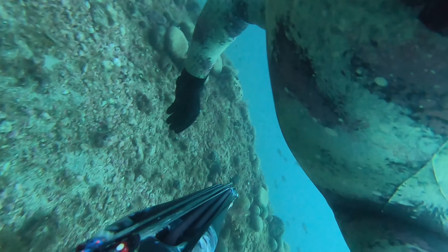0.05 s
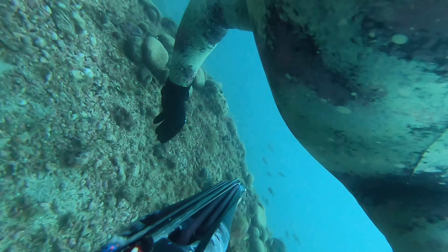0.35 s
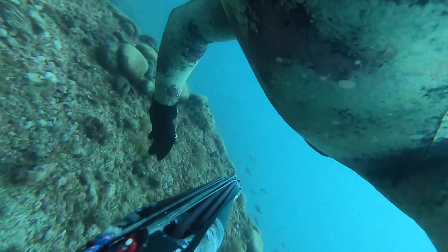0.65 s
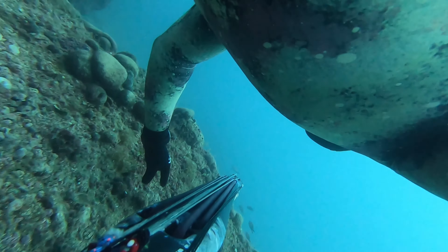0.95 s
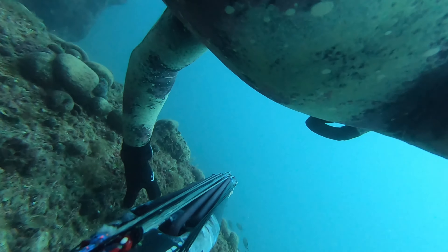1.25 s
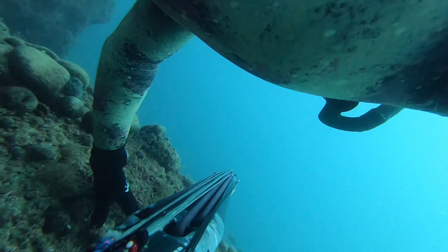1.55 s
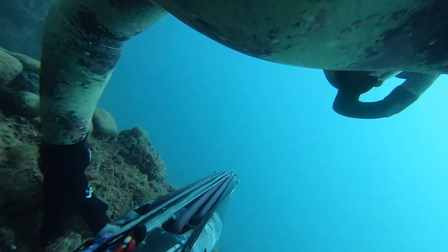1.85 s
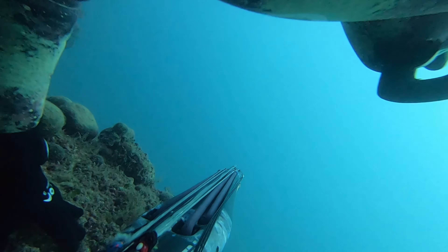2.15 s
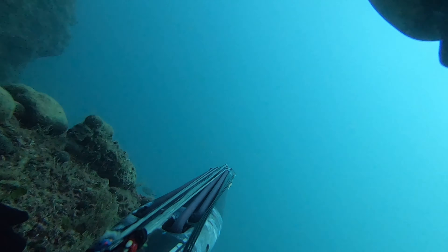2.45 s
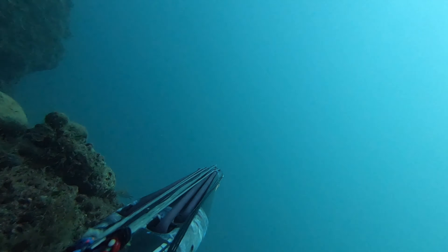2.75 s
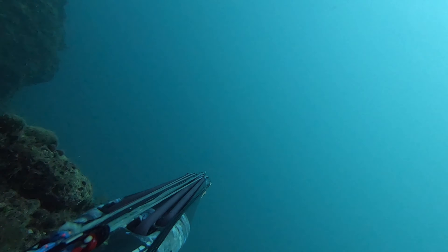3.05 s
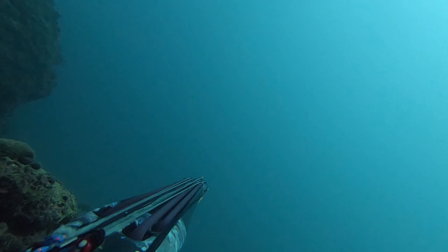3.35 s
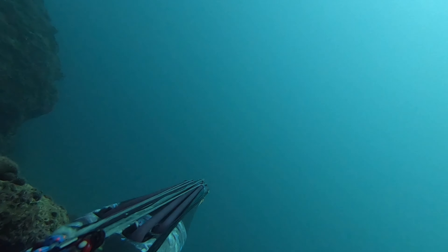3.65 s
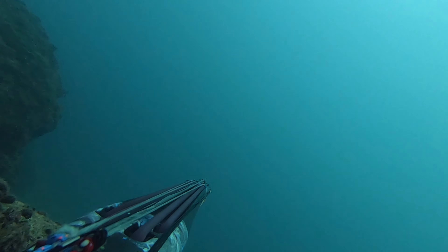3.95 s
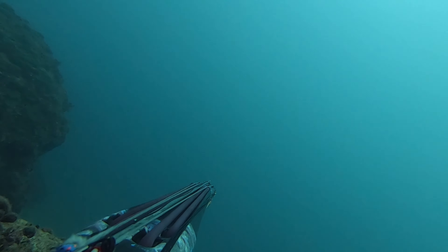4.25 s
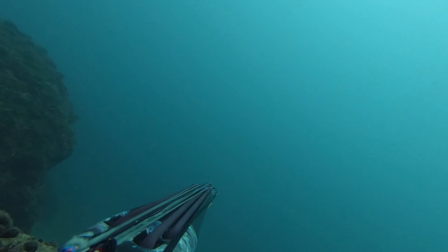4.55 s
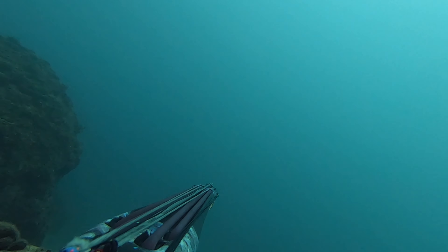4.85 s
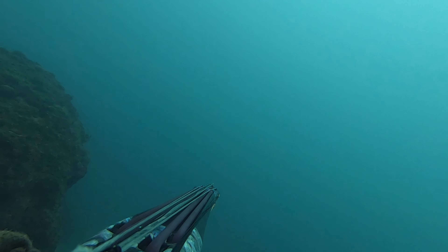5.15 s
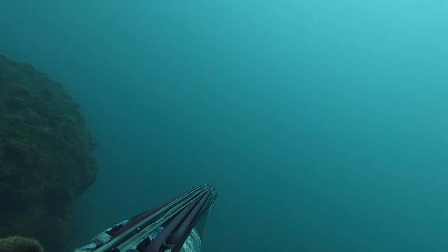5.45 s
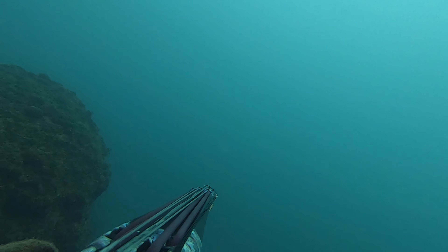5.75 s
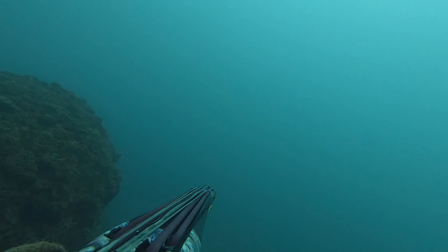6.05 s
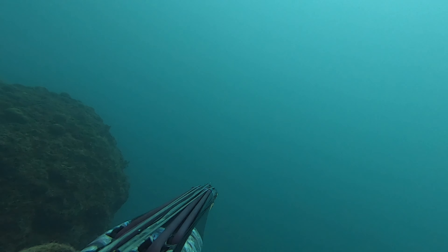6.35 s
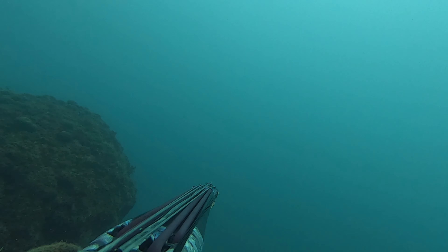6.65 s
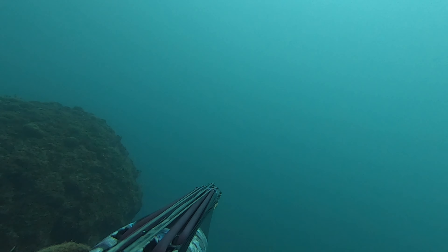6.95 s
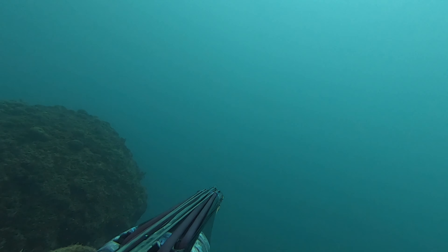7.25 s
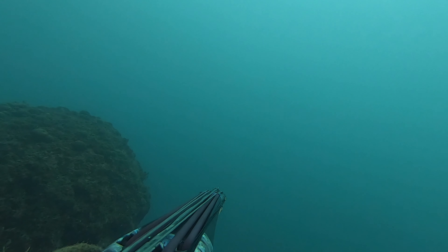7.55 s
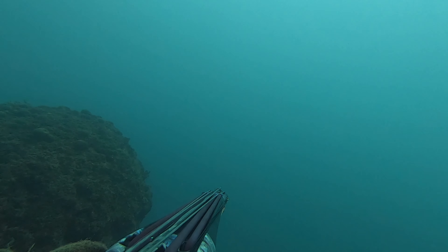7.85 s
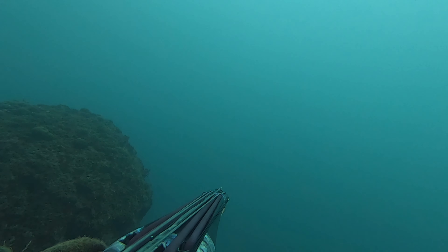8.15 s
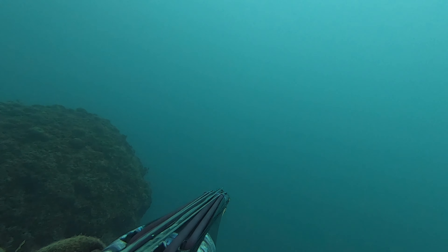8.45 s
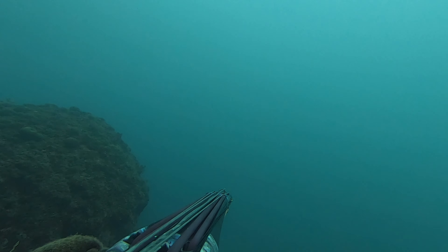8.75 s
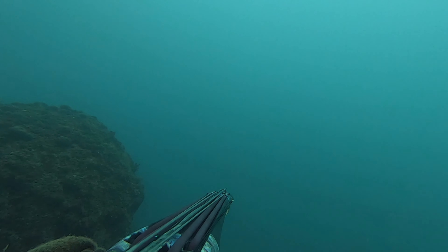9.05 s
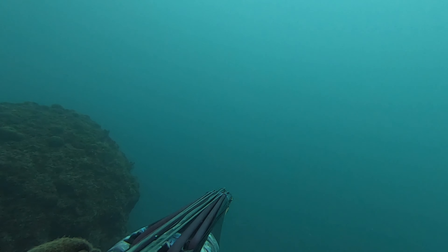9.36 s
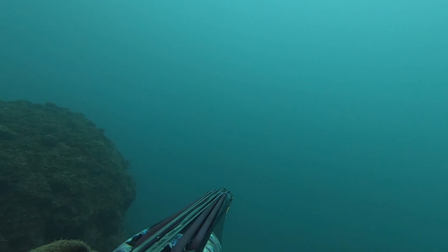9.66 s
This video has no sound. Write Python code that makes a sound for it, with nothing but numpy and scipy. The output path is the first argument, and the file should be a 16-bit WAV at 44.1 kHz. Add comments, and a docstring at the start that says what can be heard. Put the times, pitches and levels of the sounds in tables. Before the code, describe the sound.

A dense underwater crackle of tiny clicks, with close knocks, thumps and squeaky rubbing from a diver's gear and a few bubbles.

```python
"""Under the sea beside a reef, heard from inside a camera housing on a diver's speargun.
Snapping shrimp crackle all round; a deep throb, a rumble and a hollow hum swell with the water.
As the diver pulls along the rock, gear rubs, squeaks and knocks on the gun, a glove crunches
on the crust, and bubbles fizz and plop. The stereo image closes to mono for the middle seconds."""
import sys
import numpy as np
from scipy import signal
from scipy.fft import rfft, irfft, next_fast_len
from scipy.io import wavfile

SR = 44100
rng = np.random.default_rng(int(sys.argv[2]) if len(sys.argv) > 2 else 0)


def generate_wav(sig):
    """Save sig (samples, or channels by samples) to the path in sys.argv[1] as 16-bit PCM at SR."""
    pcm = np.round(np.clip(np.atleast_2d(sig).T, -1, 1) * 32767).astype(np.int16)
    wavfile.write(sys.argv[1], SR, pcm)


N = 436149
TIME = np.arange(N) / SR
TOP_HZ = 15400

# strokes of gear along the gun: start/s, length/s, level/dB, sag/dB, squeak f/Hz
RUB_STROKES = [(0.0, 0.096, -52.5, -4, 1400), (0.125, 0.15, -43, 0, 2090), (0.335, 0.09, -44, -1, 1420),
               (0.45, 0.05, -52, 3, 1400), (0.508, 0.035, -44.5, 0, 2090), (0.56, 0.09, -50, 0, 450),
               (0.668, 0.11, -40, 6.5, 1320), (1.995, 0.3, -38, 14, 1500), (2.356, 0.031, -38.5, -5, 1470),
               (2.443, 0.09, -50.5, 1, 1450), (2.555, 0.17, -40, -2, 1530), (2.753, 0.34, -38.5, 17, 750),
               (3.138, 0.04, -41, 3.5, 520), (8.79, 0.051, -42.5, 1, 1290), (8.923, 0.03, -53.5, 0, 780),
               (9.373, 0.073, -45, 8, 850)]
# stereo image: t/s, width (0 mono, 1 full)
STEREO_WIDTH = [(0, 1), (2.7, 0.95), (3.1, 0.4), (3.6, 0.01), (7.4, 0), (7.9, 0.19), (8.4, 0.72),
                (9.89, 0.8)]


def undb(db):
    """Decibels to gain."""
    return 10 ** (np.asarray(db) / 20)


def unit(x):
    """Scale to rms 1."""
    return x / np.sqrt(np.mean(x ** 2))


def peak(x, db):
    """Set the peak level."""
    return x * undb(db) / np.abs(x).max()


def add(track, s, x):
    """Mix a short sound in at s seconds."""
    i = max(int(s * SR), 0)
    track[..., i:i + x.shape[-1]] += x[..., :N - i]


def curves(table):
    """Each column after the first as an automation curve through time."""
    s, *columns = np.transpose(table)
    return [np.interp(TIME, s, c) for c in columns]


def over_pitch(table, size):
    """Each column after the first as a curve over the bins of a transform."""
    hz, *columns = np.transpose(table)
    bins = np.maximum(np.arange(size // 2 + 1) * SR / size, 1)
    return [np.interp(np.log(bins), np.log(hz), c) for c in columns]


def colour(x, points):
    """Minimum-phase EQ through (f/Hz, level/dB) points, so resonances ring after each click."""
    size = 2 * next_fast_len(len(x) // 2 + 2048)
    cepstrum = irfft(np.log(undb(over_pitch(points, size)[0])))
    cepstrum[1:size // 2] *= 2
    cepstrum[size // 2 + 1:] = 0
    return irfft(rfft(x, size) * np.exp(rfft(cepstrum)))[:len(x)]


def tinted(x, tint_db, low_hz=1500, high_hz=14000, count=7):
    """A random EQ gives a sound its own colour."""
    bands = np.geomspace(low_hz, high_hz, count)
    return colour(x, [(hz, tint_db * rng.standard_normal()) for hz in bands])


def dulled(x, top_hz, order=4):
    """Roll off the treble above top_hz, or TOP_HZ if that is lower."""
    return signal.sosfilt(signal.butter(order, min(top_hz, TOP_HZ), fs=SR, output="sos"), x)


def resonance(x, hz, width_hz):
    """What one resonance picks out of a sound."""
    return signal.lfilter(*signal.iirpeak(hz, hz / width_hz, fs=SR), x)


def walk(rate):
    """Random drift with a spread near 1, turning rate times a second."""
    knots = np.arange(0, N / SR + 1, 1 / rate)
    return 1.2 * np.interp(TIME, knots, rng.standard_normal(len(knots)))


def clicks(rate, spread_db, range_db):
    """Random impulses, most of them small and a few up to range_db larger."""
    hit, size, sign = rng.random((3, N))
    db = -spread_db * np.log(1 - size * (1 - np.exp(-range_db / spread_db)))
    return (hit < rate / SR) * undb(db) * np.sign(sign - .5)


def scatter(fade_ms, share, size=2048):
    """An impulse and a fading spray of reflections, share times as strong."""
    tail = rng.standard_normal(size) * np.exp(-np.arange(size) / SR * 1000 / fade_ms)
    tail *= share / np.linalg.norm(tail)
    tail[0] += 1
    return tail


def swell(start, length, db, sag_db, attack_s=0.028, release_s=0.014):
    """The envelope of one push: a quick rise, a sagging hold, a release."""
    t = TIME - start
    rise = np.clip(1 + t / attack_s, 0, 1) ** 2
    hold = undb(db - sag_db * np.clip(t / length, 0, 1))
    return rise * hold * np.exp(-np.maximum(t - length, 0) / release_s)


def colony(rate, spread_db, range_db, fade_ms, share, tint_db, busy_db, patches=10):
    """Patches of shrimp; each snaps in bouts and arrives with its own echoes and tint."""
    out = 0
    for _ in range(patches):
        path = tinted(scatter(fade_ms, share), tint_db)
        bouts = clicks(rate / patches, spread_db, range_db) * undb(busy_db * walk(4))
        out += signal.oaconvolve(bouts, path / np.linalg.norm(path))[:N]
    return out


def shrimp_bed():
    """Thousands of far snaps merge into a wash, under nearer crackle and a fine sizzle."""
    # the colony: t/s, far level/dB, near level/dB, share of open-water colour (0-1)
    reef_levels = [(0.0, -59.5, -65.5, 0.7), (0.9, -55.5, -65.5, 0.46), (1.85, -60.5, -64.5, 0.25),
                   (2.7, -57, -70, 0.35), (3.2, -55.5, -77, 0.54), (3.7, -57, -69.5, 0),
                   (4.7, -53.5, -66.5, 0.13), (5.1, -57.5, -69, 0), (5.6, -52.5, -67.5, 0.17),
                   (7.3, -52, -66.5, 0.14), (8.05, -53, -69, 0.78), (8.55, -51, -63.5, 1),
                   (9.89, -50.5, -62.5, 0.66)]
    # the finest sizzle: t/s, level/dB
    sizzle_levels = [(0, -84), (2.9, -85), (3.6, -83), (4.7, -75), (5.2, -79), (6.0, -75), (7.4, -74),
                     (8.1, -80), (9.89, -76)]
    # spectra of far reef, brighter open water, near crackle and sizzle: f/Hz, level/dB
    far_eq = [(250, -12), (480, -15.5), (760, -5), (1000, -13), (1140, -9), (1280, 3), (1480, -2),
              (1620, -1), (1800, -2), (2070, 3), (2350, -5), (2700, -9), (3600, -11), (5000, -24),
              (5900, -24), (6700, -32), (7700, -29), (9500, -36), (12500, -43), (15000, -58)]
    open_eq = [(250, -7), (480, -23), (770, -4.5), (1000, -23), (1260, 1.5), (1480, -13), (1620, -0.5),
               (1780, -5.5), (2070, 4.5), (2450, -2.5), (2830, -3), (3080, -20.5), (3490, -5), (5000, -25),
               (8000, -27.5), (12500, -38), (15000, -49)]
    near_eq = [(400, -25), (1000, -8), (1400, 3), (2100, -1), (2900, 5), (3500, 11), (4400, 0), (5100, 1),
               (5800, 6), (6700, -6), (8000, -2), (9500, -9), (12500, -12.5), (15500, -52)]
    sizzle_eq = [(2500, -20), (4200, -4), (4750, 5), (5200, -8), (5850, -1), (6400, -9), (7300, -2),
                 (8200, -2), (8800, -14), (11200, -14), (13000, -21), (15500, -46)]
    far_db, near_db, openness = curves(reef_levels)
    far = colony(rate=6500, spread_db=4, range_db=23.5, fade_ms=4.8, share=1.4, tint_db=2.5, busy_db=2.5)
    near = colony(rate=700, spread_db=10.5, range_db=33.5, fade_ms=1.4, share=0.8, tint_db=4, busy_db=3)
    sizzle = colony(rate=2000, spread_db=6.5, range_db=28, fade_ms=2, share=0.9, tint_db=1, busy_db=2,
                    patches=4)
    far = (1 - openness) * unit(colour(far, far_eq)) + openness * unit(colour(far, open_eq))
    near = unit(colour(near, near_eq))
    sizzle = unit(colour(sizzle, sizzle_eq))
    return far * undb(far_db) + near * undb(near_db) + sizzle * undb(curves(sizzle_levels)[0])


def rubbing(squeak_db=-2, flutter_db=3):
    """Stick-slip grains ring the housing; each stroke squeaks on and off at its own pitch."""
    # the rubbed housing: f/Hz, level/dB
    rub_eq = [(100, 1.5), (180, 0.5), (300, -6), (600, -4), (850, -1.5), (1130, -6.5), (1430, 3),
              (1800, -12), (2100, -3.5), (2550, -20), (3500, -26), (5000, -34), (12000, -65)]
    grains = colour(clicks(rate=3500, spread_db=3.5, range_db=12), rub_eq)
    grains *= undb(1.6 * walk(70))  # patchy grip
    squeak_gain = undb(squeak_db + flutter_db * walk(35))
    out = np.zeros(N)
    for *stroke, hz in RUB_STROKES:
        out += unit(grains + squeak_gain * resonance(grains, hz, width_hz=170)) * swell(*stroke)
    return out


def water(rumble_db=-15, eddy_db=2.5, throb_hz=20.96, wander=0.1095):
    """A very deep throb near 21 Hz and a low rumble swell with the flow and its sudden surges."""
    # flow past the housing: t/s, level/dB
    flow_levels = [(0.0, -35), (0.4, -46.5), (0.9, -39.5), (1.45, -42), (2.1, -41.5), (3.4, -37.5),
                   (3.7, -49.5), (4.05, -38), (4.36, -64), (4.55, -49.5), (4.95, -43.5), (5.37, -64),
                   (5.55, -38.5), (6.02, -41), (6.08, -59), (6.2, -45), (6.38, -40), (6.44, -62),
                   (6.53, -37), (6.92, -44.5), (7.1, -34.5), (7.33, -47.5), (7.48, -36), (7.89, -36.5),
                   (8.2, -49), (8.28, -39), (9.18, -47), (9.28, -49), (9.4, -34), (9.89, -45)]
    # surges: start/s, length/s, throb/dB, rumble/dB, sag/dB
    surges = [(0.62, 0.1, -36, -39, 2), (1.626, 0.37, -28.5, -47, 7.5), (2.01, 0.13, -46, -36, 5),
              (2.664, 0.28, -43, -43, -6), (3.042, 0.12, -31.5, -48, -2.5), (4.008, 0.018, -32, -40, 8),
              (4.8, 0.044, -46, -43, 10), (6.0, 0.02, -40, -44, -4), (7.686, 0.03, -48, -42, 6),
              (8.435, 0.29, -38.5, -45.5, 2.5), (8.849, 0.21, -26, -38.5, 5), (9.117, 0.092, -47, -47, -1),
              (9.385, 0.03, -30, -31, 0), (9.446, 0.53, -21.5, -47, 8.5)]
    # turbulent rumble: f/Hz, level/dB
    rumble_eq = [(15, -10), (33, 6), (47, 8.5), (64, 1.5), (85, -3), (125, -11), (300, -28), (900, -73.5)]
    flow = undb(curves(flow_levels)[0] + eddy_db * walk(14))
    throb_gain, rumble_gain = flow, flow * undb(rumble_db)
    for s, length, surge_throb_db, surge_rumble_db, sag_db in surges:
        surge = swell(s, length, 0, sag_db, attack_s=0.05, release_s=0.032)
        throb_gain = np.hypot(throb_gain, surge * undb(surge_throb_db))
        rumble_gain = np.hypot(rumble_gain, surge * undb(surge_rumble_db))
    wandering_hz = throb_hz * (1 + wander * walk(6.1))
    throb = unit(np.sin(2 * np.pi * np.cumsum(wandering_hz) / SR))
    rumble = unit(colour(rng.standard_normal(N), rumble_eq))
    return throb * throb_gain + rumble * rumble_gain


def housing_hum(flutter_db=2.5, rub_db=-6):
    """Water and rubbing stir the housing's hollow resonance."""
    # hum stirred by the water: t/s, level/dB
    hum_levels = [(0.0, -52), (0.5, -54), (0.75, -43), (0.9, -59), (1.0, -61), (1.8, -64.5), (2.3, -50),
                  (3.1, -50), (3.4, -53), (4.0, -56.5), (5.2, -58), (6.0, -58), (6.6, -55), (7.2, -56.5),
                  (7.9, -53), (8.6, -59), (9.89, -63)]
    # the hollow housing: f/Hz, level/dB
    hum_eq = [(60, -6), (115, -16), (150, -0.5), (180, 3.5), (230, -9), (320, -17), (480, -22.5),
              (1200, -61)]
    by_water = undb(curves(hum_levels)[0] + flutter_db * walk(9))
    by_rubbing = undb(rub_db) * sum(swell(*stroke) for *stroke, _ in RUB_STROKES)
    hum = unit(colour(clicks(rate=500, spread_db=2.5, range_db=15.5), hum_eq))
    return hum * np.hypot(by_water, by_rubbing)


def clack(hz, ring_db=12):
    """The hard contact of a knock; each struck place brings out one hollow resonance."""
    # contact click: f/Hz, level/dB
    click_eq = [(200, 24.5), (700, 4.5), (1500, 10), (2800, 7.5), (5000, -11), (8000, -12), (15000, -50)]
    click = colour(tinted(scatter(fade_ms=6, share=0.45), tint_db=1), click_eq)
    return click + undb(ring_db) * resonance(click, hz, width_hz=220)


def thump(age, lift_hz, sweep_rad=2.79, knee_s=0.0003, fade_s=0.0058, damping_hz=260):
    """A low thump that sweeps quickly down in pitch; lifted in pitch, it dies sooner."""
    phase = sweep_rad * np.log1p(age / knee_s) + 2 * np.pi * lift_hz * age
    rise = 1 - np.exp(-age / knee_s)
    fade = np.exp(-age / fade_s * (1 + lift_hz / damping_hz))
    chirp = signal.oaconvolve(-np.cos(phase) * rise * fade, scatter(fade_ms=6, share=0.18))[:len(age)]
    return tinted(chirp, tint_db=2.5, low_hz=404, high_hz=2500, count=10)


def knocks(contact_s=0.003, preroll_s=0.025, sub_db=-21, sub_hz=55, sub_fade_s=0.012,
           tone_hz=170, tone_lead_s=0.0019, tone_rise_s=0.0031, tone_fade_s=0.0075):
    """Each blow clacks and thumps over a sub pulse; a short low tone swells and fades around it."""
    # blows on the gun: t/s, thump/dB, clack/dB, low tone/dB, thump pitch lift/Hz,
    # left minus right at full width/dB, clack f/Hz, treble cutoff/Hz
    blows = [(0.067, -31.5, -46, -57, 18, -22, 600, 1200), (0.447, -28.5, -38, -44, 1, -29, 950, 5000),
             (0.5858, -33, -42, -55, 150, -11, 420, 1300), (0.6403, -28, -49, -47, 1, 23, 800, 1800),
             (0.8882, -43, -45, -45, 1, -27, 800, 1200), (1.06, -49, -46, -58, 100, -8, 760, 1200),
             (1.1294, -35.5, -47, -45, 1, 24, 800, 1400), (1.3464, -41.5, -39.5, -51, 70, 15, 1400, 3500),
             (1.4846, -36.5, -41, -46, 1, 17, 800, 2500), (1.637, -33, -54, -42, 1, 5, 760, 1200),
             (1.9938, -17.5, -20.5, -32.5, 1, 30, 1470, 12000),
             (2.3363, -28.5, -30, -42, 1, -29, 800, 7000), (2.5349, -22, -26.5, -31, 1, -31, 865, 10000),
             (2.718, -18, -24, -30, 1, 29, 1400, 10000), (2.9916, -24.5, -30, -33.5, 28, -4.5, 650, 6000),
             (3.0834, -30, -44, -51, 1, -20, 750, 1100), (3.0934, -29, -29, -48, 110, 9, 2080, 3500),
             (3.125, -27, -50, -45, 1, 4, 500, 600), (3.1356, -14, -22, -25.5, 14, 4, 2700, 5500),
             (3.1645, -31, -36, -50, 1, 4, 950, 4500), (3.1755, -24.5, -31, -49, 1, -25, 1990, 7000),
             (3.313, -28, -34, -32, 1, 4, 1490, 2200), (3.4082, -16.5, -32, -21, 83, 3, 1080, 1300),
             (3.469, -27, -32, -32, 1, 3, 1730, 6000), (3.505, -29, -38, -52, 69, 0.5, 600, 1200),
             (3.5524, -31, -36, -34, 68, 1, 800, 3500), (3.9833, -29, -29, -53, 70, 4, 1420, 3500),
             (4.0105, -28, -42, -43, 100, 3, 1550, 1300), (4.158, -20, -22.5, -18, 20, 0, 1620, 3200),
             (4.181, -27, -21, -51, 350, 0, 1150, 1700), (4.4656, -29, -31.5, -24.5, 147, -2, 1600, 6500),
             (4.7665, -32.5, -56, -38.5, 1, -3.5, 800, 700), (4.779, -28, -60, -50, 1, -2, 400, 150),
             (4.9063, -19, -36, -26, 91, -1, 1050, 1800), (4.9285, -37, -39, -50, 120, -1, 700, 1500),
             (5.08, -35.5, -45, -53, 50, -3.5, 1400, 3000), (5.1424, -30, -38, -37, 1, -4, 800, 3500),
             (5.5035, -18.5, -24, -30, 35, -2, 1920, 5500), (5.585, -25, -31, -30, 27, -4, 1880, 3800),
             (5.6958, -33, -32, -59, 60, -4.5, 1500, 4200), (8.061, -32.5, -41, -46, 1, 0, 810, 1000)]
    t = np.arange(6144) / SR - preroll_s - contact_s
    age = np.maximum(t, 0)
    sub = -undb(sub_db) * np.sin(2 * np.pi * sub_hz * age) * np.exp(-age / sub_fade_s)
    tone_envelope = np.exp(np.minimum(t, 0) / tone_rise_s - age / tone_fade_s)
    tone = np.sin(2 * np.pi * tone_hz * (t + tone_lead_s)) * tone_envelope
    out = np.zeros((2, N))
    for s, thump_db, clack_db, tone_db, lift_hz, pan_db, clack_hz, top_hz in blows:
        thud = dulled(thump(age, lift_hz), top_hz)
        body = peak(thud, thump_db) + undb(thump_db) * sub + peak(tone, tone_db)
        width = np.interp(s, *np.transpose(STEREO_WIDTH))
        pan = undb(width * np.array([[pan_db], [-pan_db]]) / 2)
        add(out, s - preroll_s, pan / pan.mean() * body)
        add(out, s + contact_s, -peak(dulled(clack(clack_hz), top_hz), clack_db))  # dead centre
    return out


def slips(squeak_db=6, catches_per_s=6000, rise_s=0.00029, size=4096):
    """Gear slips hard against the gun: a burst of tiny catches makes a squeaky rasp."""
    # short slips: t/s, peak/dB, fade/ms, squeak f/Hz
    slip_cues = [(0.124, -27, 5.4, 2000), (0.138, -27, 9.9, 1390), (0.222, -25.5, 3.8, 2060),
                 (0.26, -22.5, 3, 1490), (0.298, -28, 3.1, 2090), (0.356, -33, 2.9, 2090),
                 (0.429, -24.5, 7.5, 970), (0.532, -34, 3.2, 1430), (0.694, -31, 4, 1360),
                 (0.736, -24.5, 4.3, 1350), (1.292, -36.5, 3.4, 1370), (1.615, -29, 6.4, 767),
                 (1.656, -40, 2.2, 960), (1.945, -32.5, 8.1, 765), (1.984, -33, 6.2, 1540),
                 (2.104, -30, 5.1, 1500), (2.129, -22, 3.7, 1360), (2.177, -30.5, 3.5, 785),
                 (2.2868, -16, 4.5, 1420), (2.371, -26, 8.9, 1420), (3.132, -32, 4, 2000),
                 (3.4, -38.5, 6.1, 1500), (3.976, -36, 4, 1450), (4.083, -37, 3, 760),
                 (4.95, -36, 9.2, 825), (5.614, -36, 4, 2050), (8.929, -32, 4.6, 767),
                 (9.374, -30.5, 3.2, 1530), (9.412, -32, 7.6, 810)]
    # the rasp: f/Hz, level/dB
    rasp_eq = [(150, 0), (550, -12.5), (850, -2.5), (1150, -7), (1450, 0), (1800, -9.5), (2100, -2),
               (2600, -23), (4500, -37.5), (12000, -58)]
    t = np.arange(size) / SR
    rise = 1 - np.exp(-t / rise_s)
    out = np.zeros(N)
    for s, db, fade_ms, hz in slip_cues:
        catches = rng.standard_normal(size) * (rng.random(size) < catches_per_s / SR)
        rasp = colour(catches * rise * np.exp(-1000 * t / fade_ms), rasp_eq)
        add(out, s, peak(rasp + undb(squeak_db) * resonance(rasp, hz, width_hz=170), db))
    return out


def close_snaps(ring_db=3):
    """The closest shrimp stand out singly: a bright, ringing edge over a duller body."""
    # single snaps: t/s, edge peak/dB, body peak/dB, ring f/Hz
    snaps = [(0.1375, -41, -45, 3500), (0.3526, -50, -38, 3600), (0.6956, -35, -41, 2900),
             (0.77, -37.5, -35, 3450), (0.8584, -40, -35, 3450), (0.9904, -48, -33.5, 3600),
             (1.014, -31, -47, 5800), (1.1005, -30.5, -34, 2850), (1.153, -28.5, -55, 6600),
             (1.1655, -39, -58, 5550), (1.291, -46, -47, 3550), (1.418, -50, -42, 8100),
             (1.6686, -31, -39.5, 3750), (1.7795, -43, -60, 3550), (1.843, -41, -46, 5800),
             (2.1011, -42, -55, 5800), (2.225, -44, -59, 9100), (2.445, -37, -52, 5600),
             (2.5303, -36, -31.5, 2850), (3.5018, -41, -58, 8200), (3.8473, -39, -57, 5900),
             (3.9966, -34, -26.5, 3600), (4.6792, -41, -50, 4500), (4.7783, -40, -27.5, 2900),
             (4.8259, -58, -46, 2850), (4.8792, -39, -39, 5850), (5.2115, -46, -57, 6100),
             (5.5335, -40, -53, 7300), (5.5986, -43, -50, 4800), (5.6894, -51, -40, 3300),
             (5.882, -36, -50, 6000), (5.9346, -43, -55, 7800), (5.9737, -34, -30, 2850),
             (6.015, -50, -30, 2950), (6.2552, -46, -50, 6000), (6.269, -40.5, -50, 7500),
             (6.4126, -43, -43, 4750), (6.526, -47, -33, 3100), (6.541, -30, -41, 7900),
             (6.5681, -55, -34, 2900), (6.7046, -45, -52, 3550), (6.8133, -52, -35, 2900),
             (6.97, -38.5, -50, 3650), (7.1039, -39.5, -39, 3250), (7.1634, -36, -33.5, 3550),
             (7.328, -37, -43, 4800), (7.3356, -38, -48, 4800), (7.41, -28.5, -55, 5100),
             (7.5815, -37.5, -47, 6600), (7.655, -38, -44, 3500), (7.6956, -52, -30.5, 3250),
             (7.868, -38, -37, 3550), (7.8838, -38, -46, 3550), (7.9354, -43, -50, 12000),
             (8.3386, -36, -33, 2850), (8.3871, -38, -31.5, 3550), (8.4255, -41, -52, 5750),
             (8.449, -46, -50, 5800), (8.5739, -39, -49, 3550), (8.6158, -36.5, -47, 3650),
             (8.6592, -45, -43, 3550), (8.842, -37, -46, 3550), (9.1557, -38, -46, 5950),
             (9.312, -48, -32, 2850), (9.5162, -45, -52, 3450), (9.645, -34.5, -38.5, 3900),
             (9.6599, -33, -38, 3600), (9.769, -35, -49, 4800), (9.85, -32.5, -35, 7800)]
    # spectra of a snap's edge and body: f/Hz, level/dB
    edge_eq = [(1000, -23), (3000, 12), (4200, 8), (5000, 5.5), (5900, 8), (6800, 1.5), (8000, 1),
               (10000, -8), (13000, -16), (16000, -32)]
    body_eq = [(400, -10.5), (1000, -27), (1400, 4.5), (1800, -1), (2100, 2), (3300, -0.5), (5000, -18.5),
               (12000, -62)]
    out = np.zeros(N)
    for s, edge_db, body_db, ring_hz in snaps:
        crack = scatter(fade_ms=0.6, share=1.9, size=256)
        crack = np.convolve(crack, scatter(fade_ms=4, share=0.5))[:2048]
        edge = colour(tinted(crack, tint_db=1), edge_eq)
        edge += undb(ring_db) * resonance(edge, ring_hz, width_hz=900)
        body = colour(scatter(fade_ms=2.1, share=1), body_eq)
        add(out, s, peak(edge, edge_db) + peak(body, body_db))
    return out


def hollow_tones(hz=182, swell_s=0.011, size=4096):
    """A short, low, hollow tone swells and fades near some of the knocks."""
    # low tones: centre t/s, peak/dB
    tone_cues = [(0.8, -40), (3.391, -32), (3.521, -37), (4.497, -34), (4.545, -44), (4.935, -38)]
    t = (np.arange(size) - size // 2) / SR
    tone = np.sin(2 * np.pi * hz * t) * np.exp(-(t / swell_s) ** 2)
    out = np.zeros(N)
    for s, db in tone_cues:
        add(out, s + t[0], undb(db) * tone)
    return out


def glove_crunches():
    """The glove crushes the crust on the rock: short handfuls of brittle grains."""
    # grips on the rock: start/s, length/s, level/dB, sag/dB
    grips = [(0.855, 0.06, -54, 3), (0.955, 0.05, -52, 0), (1.04, 0.035, -57, 0), (1.205, 0.045, -59, -1),
             (1.385, 0.025, -55, 0), (1.825, 0.015, -57, 0)]
    # breaking crust: f/Hz, level/dB
    crust_eq = [(500, -22), (1100, -16), (1350, 2), (1850, -4), (2100, 3), (3000, -4), (3600, -2),
                (4500, -19), (5800, -16), (8000, -32), (14000, -52)]
    grains = unit(colour(clicks(rate=2200, spread_db=4, range_db=18), crust_eq))
    return grains * sum(swell(*grip, attack_s=0.008) for grip in grips)


def ping(hz, cycles, glide_per_s=1.0):
    """A brief ring that rises slightly in pitch as it fades."""
    t = np.arange(4096) / SR
    return np.sin(2 * np.pi * hz * t * (1 + glide_per_s * t)) * np.exp(-2 * hz * t / cycles)


def fizz(spread_octaves=0.3, sizes=8):
    """Bubbles ring at the pitch of their size: puffs of small ones fizz, larger ones gurgle."""
    # puffs: start/s, length/s, level/dB, sag/dB, centre f/Hz
    puffs = [(0.981, 0.031, -47, 11, 3280), (3.097, 0.08, -53.5, -2, 2800), (3.14, 0.22, -55, 8, 3350),
             (3.19, 0.22, -60, 2, 650), (3.504, 0.25, -58, 6, 476), (4.006, 0.08, -54, 4, 3500),
             (4.04, 0.11, -50.5, 4, 2450), (4.483, 0.1, -58.5, 8, 616), (4.93, 0.04, -56, 6, 700),
             (5.34, 0.15, -61, -2, 860)]
    out = np.zeros(N)
    for *puff, centre_hz in puffs:
        cloud = np.zeros(N)
        for hz in centre_hz * 2 ** (spread_octaves * np.linspace(-1, 1, sizes)):
            births = clicks(rate=350, spread_db=3.5, range_db=27)
            cloud += signal.oaconvolve(births, ping(hz, cycles=8))[:N]
        out += unit(cloud) * swell(*puff)
    return dulled(out, top_hz=4700, order=8)


def pings(rise_s=0.00082):
    """Short pings blurred by echoes: bubble plops and the ring of a few close snaps."""
    # single pings: t/s, peak/dB, f/Hz
    ping_cues = [(0.992, -31, 3470), (0.994, -35, 3900), (1.016, -35, 3200), (1.04, -52, 766),
                 (1.457, -48, 765), (3.803, -47.5, 810), (4.02, -39, 598), (4.023, -38.5, 2050),
                 (4.16, -39, 3250), (4.228, -49.5, 1020), (4.463, -41, 403), (4.502, -46, 1050),
                 (4.595, -42, 680), (4.685, -46.5, 770), (5.976, -36, 2950), (7.87, -39, 3550),
                 (8.066, -42, 300), (8.37, -43, 754), (8.46, -48, 710)]
    out = np.zeros(N)
    for s, db, hz in ping_cues:
        ring = ping(hz, cycles=7)
        ring *= 1 - np.exp(-TIME[:len(ring)] / rise_s)
        add(out, s, peak(signal.oaconvolve(ring, scatter(fade_ms=9.3, share=0.93)), db))
    return out


def two_ports(x, shifts_per_s=30, one_port_share=0.3, count=4):
    """Sound reaches the housing's two ports out of step; the closed image leans to one port."""
    # how the walls set the ports against each other: f/Hz, side minus mid/dB, side phase/rad
    wall_response = [(30, -15, -3.5), (180, -9, -3), (490, -4, -1.15), (686, -2, -2), (960, 12, -1.5),
                     (1040, 6, -3), (1200, -1.5, -5), (1530, -5, -5), (1750, 0.5, -1.5), (1980, 4, -2),
                     (2080, -0.5, -2), (2300, -12, -2.5), (2720, 0, -1.64), (3500, -12, -1.5),
                     (4860, 3, -2.5), (5850, -21, -2), (8300, -7, -2.5), (14000, -10, -3)]
    # sound arriving by unrelated, shifting paths: f/Hz, level/dB
    stray_eq = [(50, -11.5), (250, -2.5), (900, -1), (1400, -7.5), (3500, -4.5), (5000, 5), (7200, 6.5),
                (14000, -1)]
    size = 2 * next_fast_len(N // 2 + 2048)
    side_db, phase = over_pitch(wall_response, size)
    side = irfft(rfft(x, size) * undb(side_db) * np.exp(1j * phase))[:N]
    paths = [scatter(fade_ms=0.95, share=2.7) for _ in range(count)]
    stray = sum(signal.oaconvolve(x, p / np.linalg.norm(p))[:N] * walk(shifts_per_s) for p in paths)
    side += colour(stray / np.sqrt(count), stray_eq)
    width = curves(STEREO_WIDTH)[0]
    mid = x - one_port_share * (1 - width) * side
    return np.array([mid + width * side, mid - width * side])


def scene():
    """Reef, gear and water through the housing, with the knocks carried straight along the gun."""
    reef = shrimp_bed() + close_snaps()
    handling = rubbing() + slips() + glove_crunches()
    ringing = fizz() + pings()
    low_end = water() + housing_hum() + hollow_tones()
    return two_ports(reef + handling + ringing + low_end) + knocks()


def record(dry):
    """The camera cuts the top end steeply."""
    return signal.sosfilt(signal.ellip(8, .2, 70, TOP_HZ, fs=SR, output="sos"), dry)


dry = scene()
out = record(dry)
generate_wav(out)
```